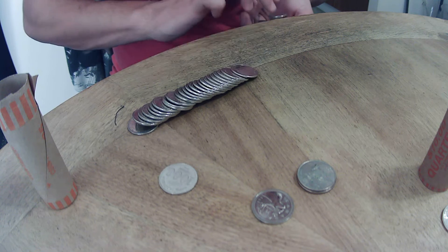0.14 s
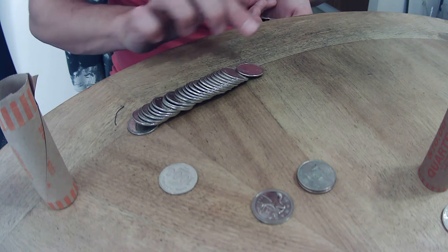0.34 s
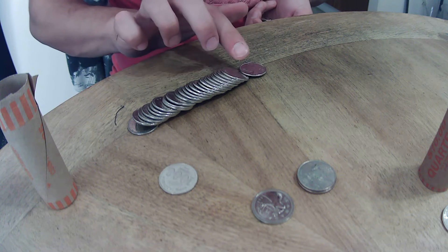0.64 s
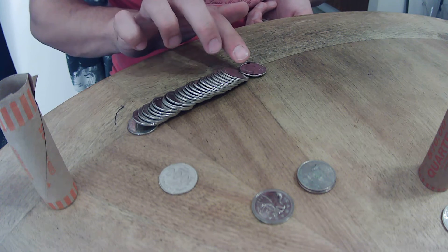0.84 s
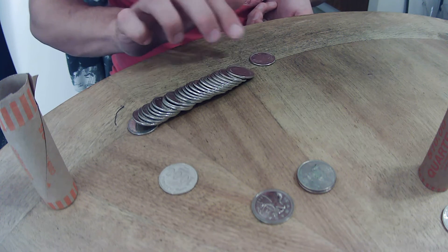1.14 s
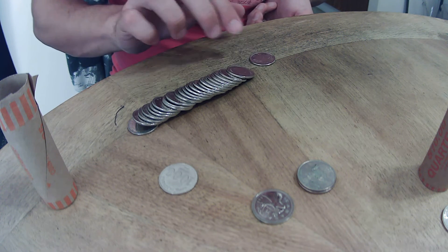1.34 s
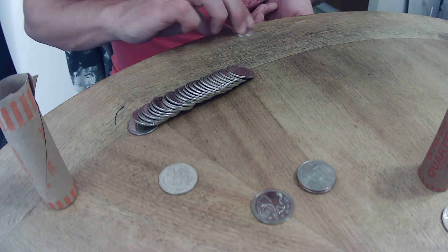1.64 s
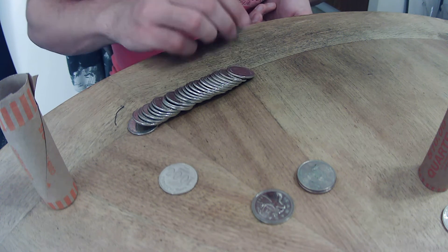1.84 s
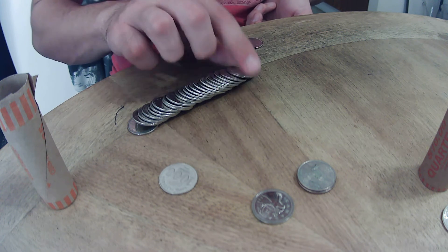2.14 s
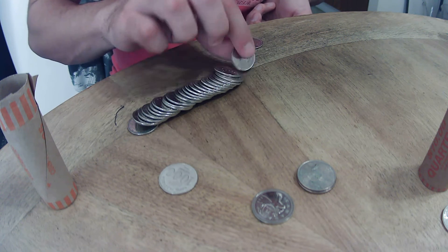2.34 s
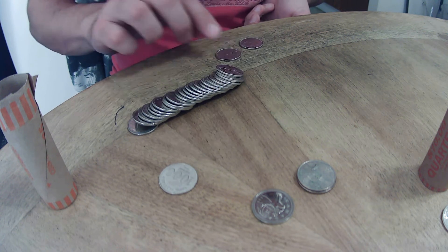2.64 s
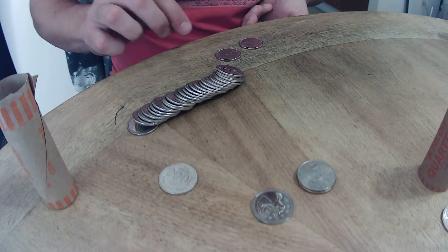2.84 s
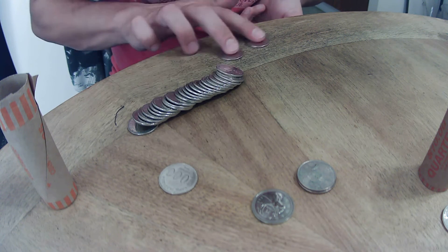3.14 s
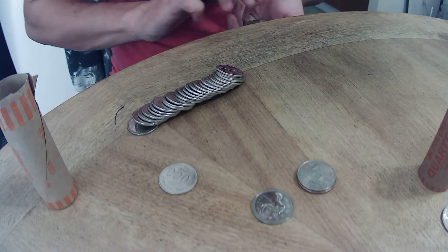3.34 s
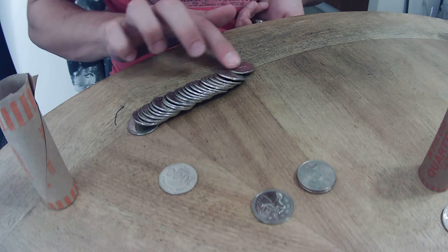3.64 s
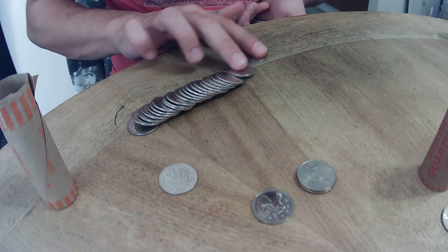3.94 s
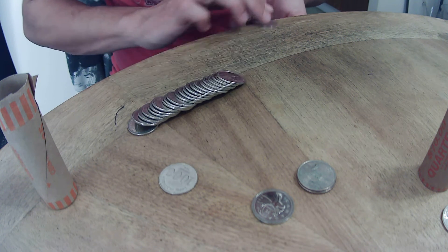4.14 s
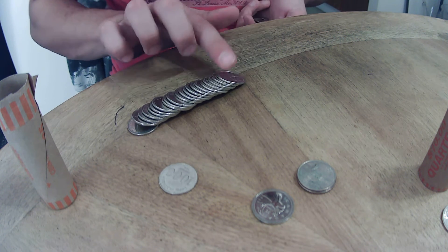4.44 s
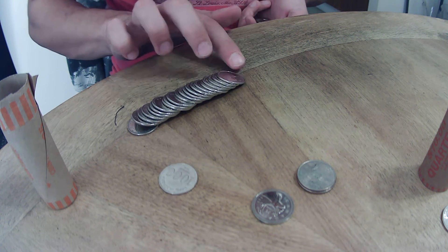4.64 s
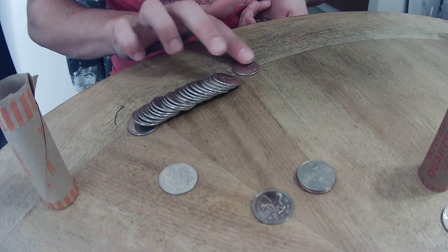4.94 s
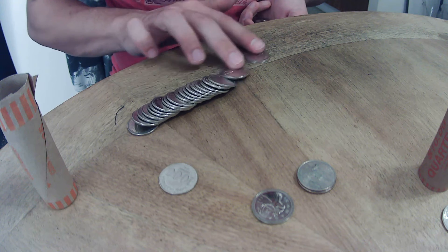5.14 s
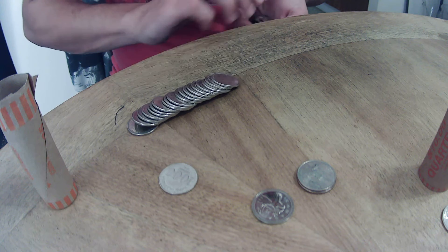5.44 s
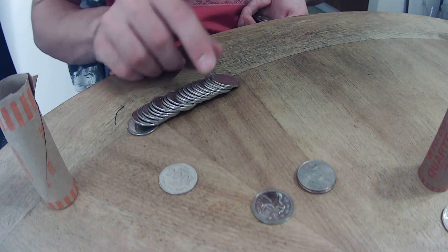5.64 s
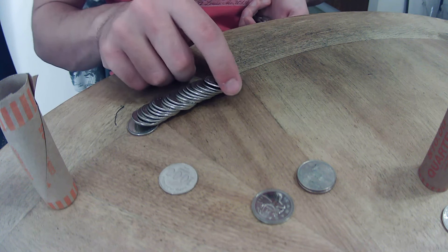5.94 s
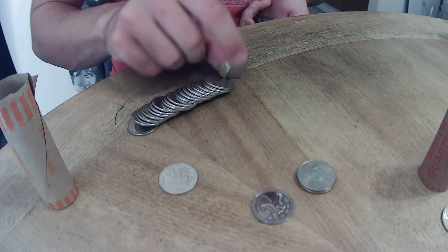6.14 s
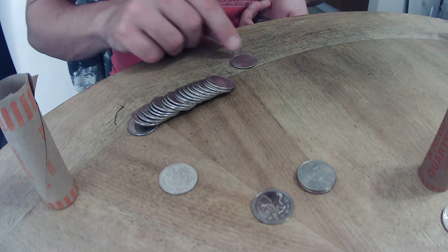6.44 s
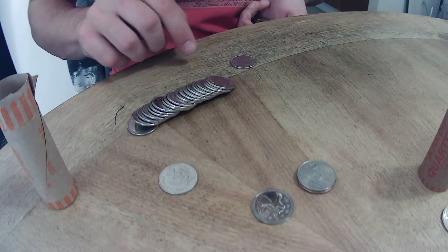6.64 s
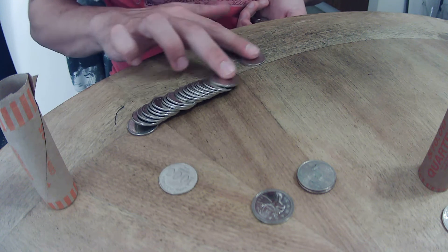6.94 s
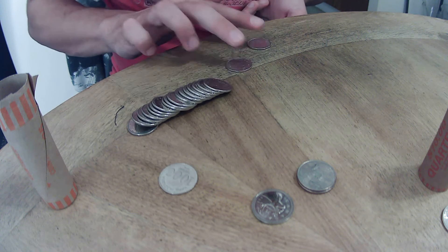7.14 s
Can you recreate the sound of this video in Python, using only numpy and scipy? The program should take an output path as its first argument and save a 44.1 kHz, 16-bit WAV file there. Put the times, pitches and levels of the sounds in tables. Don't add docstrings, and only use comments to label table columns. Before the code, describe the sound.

Metal coins are moved one at a time from a leaning stack on a wooden table. A quick bright rattle opens, then gritty scrapes and sharp flat slaps follow at uneven intervals, with more jangles midway. Late on, a coin flutters to rest in quick fading taps. Close microphone, small dry room, faint steady appliance hum.

```python
import sys
import numpy as np
from scipy import signal
from scipy.fft import rfft, irfft
from scipy.io import wavfile

SR = 44100
rng = np.random.default_rng(int(sys.argv[2]) if len(sys.argv) > 2 else 0)


def boost_factor(decibels):
    exponent = np.asarray(decibels, float) / 20
    return 10 ** exponent


def put_to_file(sound):
    columns = np.atleast_2d(sound).T
    safe = np.clip(columns, -1, 1)
    whole_steps = np.round(safe * 32767)
    wavfile.write(sys.argv[1], SR, whole_steps.astype(np.int16))


N = 321930

# hz [Hz], level_db [dB per Hz]
WHIR = [(12, -25), (20, 2), (63, 2), (146, -16.5), (177, -13), (216, -20), (301, -17.5), (388, -20.5),
        (558, -20), (607, -20), (718, -19.5), (1960, -19), (2390, -16.5), (3250, -31.5), (16000, -41)]
# pitch_hz [Hz], width_hz [Hz]
HUM = [(59.2, 18), (186.5, 5), (297.2, 3), (472, 3), (596.3, .2), (1192.5, .6), (1790.5, 1), (2310.9, .4)]
HUM_LEVELS = [-51, -59, -63.5, -67, -49.5, -90.5, -75.5, -54]
# hz [Hz], t60_s [s]
ROOM_DECAY = [(300, 0.21), (2000, 0.16), (6000, 0.2), (14000, 0.16)]

# start_s [s], fastest_s [s], stop_s [s], scrape_db [dB], rim_hiss_db [dB re scrape]
SLIDES = [(.008, -0.003, 0.092, -29.5, -3), (0.077, 0.117, 0.16, -36.5, -5), (0.933, 0.5, 1.2, -45, 4),
          (1.54, 1.59, 1.64, -33, -16), (1.58, 1.645, 1.72, -29, -14), (1.676, 2.2, 1.8, -36, -32),
          (1.84, 1.5, 2.06, -43, -25), (2.195, 1, 2.2, -41, 3), (2.237, 2, 2.26, -31, -1),
          (2.25, 1.5, 2.345, -32, -15), (2.438, 2.5, 2.58, -43, -30), (3.17, 3.255, 3.3, -32, -17),
          (3.6, 3.5, 3.73, -31, -8), (3.763, 4.5, 4.1, -51, -21), (3.9, 4, 4, -30, -14),
          (4.009, 4.07, 4.15, -33, -14), (4.06, 4.13, 4.2, -35, -10), (4.819, 6, 4.83, -27.5, -4),
          (4.832, 4.884, 4.965, -34, -9), (5.09, 5, 5.4, -36.5, -13), (5.116, 5.204, 5.28, -30.5, -11),
          (5.213, 5, 5.47, -31.5, -10.5), (5.26, 5.33, 5.39, -35, -9), (6.4, 6.43, 6.18, -44, 5),
          (6.968, 7.07, 7.08, -28, -16), (7.055, 7.08, 7.06, -28, -14)]
# pitch_hz [Hz], level_db [dB], t60_s [s]
SCRAPE_MODES = [(925, -10, 0.05), (1097, -10, 0.0322), (1450, -2, 0.023), (1813, 0, 0.026),
                (2100, 0.5, 0.022), (2500, 2.5, 0.016), (2900, -1.5, 0.0099), (3654, -2.5, 0.012),
                (4240, -6.5, 0.0068), (5400, -16, 0.0033)]
# start_s [s], fastest_s [s], stop_s [s], level_db [dB], pitch_hz [Hz]
SINGS = [(1.6, 1.625, 1.65, -34, 2130), (1.63, 1.655, 1.69, -40.5, 2250), (1.69, 1.712, 1.72, -35.5, 2060),
         (1.635, 1.652, 1.67, -35, 3900), (1.576, 1.6, 1.65, -40, 3370), (5.16, 5.178, 5.205, -42, 1950),
         (5.22, 5.27, 5.33, -40, 3300), (4.07, 4.11, 4.17, -42, 3300), (5.24, 5.255, 5.29, -36, 2500),
         (5.3, 5.33, 5.35, -44, 2000), (1.56, 1.575, 1.6, -43, 1200), (1.555, 1.595, 1.64, -42, 4300),
         (1.6, 1.645, 1.68, -47, 5600), (1.69, 1.715, 1.728, -45, 3700), (.0, .03, .09, -40, 3000),
         (4.04, 4.065, 4.1, -33, 1900), (1.885, 1.9, 1.94, -40, 2100)]

# start_s [s], liveliest_s [s], sizzle_db [dB]
RUBS = [
    (3.632, 3.637, -27),
    (3.978, 3.988, -39),
    (4.863, 4.888, -45),
    (5.147, 5.19, -54),
    (7.015, 7.065, -41.5),
]
# start_s [s], liveliest_s [s], jangle_db [dB], ring_db [dB], ring_start_db [dB]
RATTLES = [(0.193, 0.198, -21.5, -32, -25), (0.226, 0.232, -18, -11, -30), (0.306, 0.313, -28.5, -26, -40),
           (2.31, 2.35, -40, -19, -55), (3.36, 3.401, -20, -5.5, -14), (3.468, 3.473, -32.5, -40, -49),
           (4.227, 4.284, -23.5, -22, -30), (4.314, 4.324, -27, -26, -36), (5.4, 5.457, -24.5, -11, -20),
           (3.632, 3.635, -28.5, -55, -55), (.972, .982, -26, -24, -30), (6.405, 6.49, -55, -45, -36)]
# pitch_hz [Hz], level_db [dB], t60_s [s]
COIN_MODES = [(11045, -11, .04), (11170, -8, .05), (11270, -2, .075), (11345, -5, .05), (11420, -6, .05),
              (11495, -1.5, .065), (11570, -4, .06), (11680, -8, .05), (11820, -11, .035)]
# time_s [s], peak_db [dB], ring_db [dB re peak], sparkle_db [dB re peak]
TICKS = [(0.042, -36, -8, -10.5), (0.0644, -37, -7, -10), (0.095, -34, -6.5, -8), (0.1084, -33, -16, -12),
         (0.1191, -24.5, -21, -21), (0.94, -35.5, -17, -2), (2.193, -37, -18, 3.5), (2.2374, -35, -20, 3),
         (2.2947, -34, -22, -5), (2.304, -35, -11, 2), (2.314, -38, -2, 11.5), (2.339, -26, 3, 4.5),
         (3.612, -40, -25, -6), (3.6644, -38, -14, -3), (3.736, -25, -14, -9), (3.916, -37.5, -21, -10),
         (3.976, -40.5, 3, 4), (4.846, -44, -20, 4), (3.934, -42, -21, -10), (3.945, -42, -21, -10),
         (4.8556, -36.5, -18, 5), (4.897, -45, -9, 3), (5.0938, -43, -16, -1), (5.1066, -36, -15, -4),
         (5.145, -33, -18, -5), (5.1716, -42, 0, -1), (5.199, -34, -7, -8), (5.838, -55, -6, 13.5),
         (5.876, -47, -10, 3), (6.197, -41, -5, 7), (6.2412, -44, -8, -1), (6.999, -42, -11, -8),
         (7.0154, -40, -10, 4)]
# time_s [s], peak_db [dB], ring_db, sparkle_db, clack_db [all dB re peak]
JANGLES = [(0.194, -15, -7, -6, -7.5), (0.224, -16, 2, 4, 0), (0.2397, -19, -2, -3.5, -28),
           (0.247, -21, -9, -7, -18), (0.2647, -20, 0, -3, -31), (0.3066, -21.5, 0.5, -4, -20),
           (3.3556, -17, 2.5, 2.5, -3.5), (3.36, -22.5, 0, -7.5, -17), (3.3872, -18, 1, 4, -7),
           (3.379, -27, -6, -8, 8), (3.3975, -18.5, 3, -5, 4), (3.415, -31.5, -3, 1, 3),
           (3.372, -20.5, -6, 0, -15), (3.431, -26, -2, -3, -4), (5.4436, -21, -4, 2, -20),
           (3.467, -24, -7, 0, -23), (4.2275, -14.5, -8, -4.5, -5.5), (4.236, -14.5, 1, -11, -11),
           (4.242, -14.5, -3, 1, -10), (4.266, -17.5, 0.5, 2, -22), (4.2838, -18, -4, -1, -5.5),
           (4.315, -29, -15, 5, -20), (5.4019, -14.5, -11, -7, -20), (5.4105, -23, 4, -4, 4),
           (5.4163, -19, 1, -0.5, -18), (5.4479, -24, 7, 5, -20), (5.456, -19.5, -15, 3, -6)]

# pitch_hz [Hz], level_db [dB]
WOOD_LEVEL = [(700, -6), (1200, -6.5), (2000, 0.5), (3000, -1), (4500, -0.5), (7000, -32.5)]
# pitch_hz [Hz], t60_s [s]
WOOD_DECAY = [(700, 0.093), (2000, 0.03), (4000, 0.024), (7000, 0.0084)]
TABLE_MODES = [800, 1010, 1400, 1590, 1930, 2200, 2510, 2890, 3110, 3600, 3900, 4190, 4480, 5050]
# pitch_hz [Hz], level_db [dB], t60_s [s]
THUD_MODES = [(304, -6, 0.036), (437, 2, 0.026), (621, -8.5, 0.086)]
# time_s [s], pitch_hz [Hz], level_db [dB], t60_s [s]
NOTES = [(0.9719, 1932, -17, 0.063), (0.9723, 2500, -13.5, 0.043), (0.972, 4170, -17, .04),
         (1.9531, 2610, -19, 0.029), (1.952, 1990, -17, .06), (2.555, 2580, -15, 0.027),
         (2.5552, 3210, -20, 0.067), (2.572, 2450, -22.5, .04), (3.6345, 2860, -20, .025),
         (3.7212, 2150, -18, .03), (3.745, 2880, -23, 0.027), (4.0137, 2500, -12.5, 0.048),
         (4.0143, 4230, -18, .04), (4.953, 2850, -22, .03), (6.2846, 1960, -22, 0.036),
         (6.3836, 2063, -13, 0.071), (6.3836, 1600, -22, 0.066), (6.3823, 4220, -16, 0.028),
         (6.393, 2060, -15, .05), (6.4105, 2090, -18, .03), (6.4093, 4300, -18, 0.018),
         (6.4458, 4400, -24, .025), (6.477, 4500, -21, 0.018), (6.526, 4230, -25, 0.017),
         (7.0872, 2130, -22, 0.035), (3.374, 5220, -23, .04), (3.394, 4520, -24.5, 0.041),
         (3.416, 4420, -24, 0.036), (4.228, 7760, -21, .02), (4.239, 7800, -26, .04),
         (.9718, 7500, -20, .02), (2.5548, 7400, -19, .02), (2.564, 6600, -26, .05),
         (4.0226, 7500, -21, .015), (5.2085, 4300, -15, .012), (5.2085, 7000, -20, .012),
         (1.9524, 5900, -21, .02), (1.963, 3600, -24, .06), (1.963, 4700, -26, .04),
         (6.2843, 3100, -18, .01), (7.0872, 3770, -20, .03), (7.0872, 5040, -21, .02),
         (.2275, 4500, -22, .04), (.2405, 5500, -24, .03), (.248, 4300, -27, .04),
         (3.7212, 4190, -17, .015), (3.7452, 4200, -19, .015), (4.952, 3940, -22, .02),
         (5.412, 4700, -26, .03), (4.232, 4600, -24, .05), (4.268, 4400, -27, .05), (5.445, 4600, -28, .05),
         (5.465, 5000, -30, .05)]
# time_s [s], peak_db [dB], pitch_hz [Hz], thud_db [dB re peak]
TAPS = [(0.066, -25, 2000, -13), (0.0832, -23.5, 1940, -15), (0.099, -27, 2200, -17),
        (0.1411, -24.5, 1770, -16), (0.9394, -22.5, 1900, -16), (1.8355, -29, 2100, -0.5),
        (1.899, -34, 2090, -17), (2.1945, -25, 1950, -14.5), (2.243, -24.5, 1620, -11.5),
        (2.3146, -16, 1870, -14), (2.343, -15, 1930, -17), (2.339, -21, 1930, -15),
        (5.4562, -27, 1400, -10), (5.385, -30, 2500, -15), (2.3585, -24.5, 2900, -4.5),
        (2.4297, -19.5, 1790, -14), (2.4603, -34, 1840, -8), (3.2875, -26.5, 2290, -30),
        (3.664, -27.5, 2320, -2), (3.977, -19.5, 1780, -14), (4.8567, -21.5, 2250, -6),
        (4.8972, -28, 1540, -10), (4.932, -25.5, 1330, -23), (5.092, -34, 2100, -3.5),
        (5.1453, -31, 1900, -5), (5.1748, -24, 1960, -16), (5.277, -20, 2500, -37), (5.376, -27, 2140, -12),
        (5.8396, -32.5, 2300, -19), (6.197, -26.5, 2420, -10.5), (6.24, -34.5, 2290, -5),
        (6.9995, -37, 1920, 0), (7.0184, -32.5, 2200, -4)]
# time_s [s], knock_db [dB], pitch_hz [Hz], thud_db [dB re knock], crack_db [dB]
LANDINGS = [
    (0.9603, -18, 1590, -12, -20),
    (0.9807, -16, 1600, -14.5, -16),
    (.9652, -16, 1930, -19, -37),
    (3.6355, -13.5, 2760, -14.5, -17.5),
    (2.5546, -9.5, 2890, -20.5, -3.5),
    (2.572, -15, 2500, -17, -8),
    (3.6326, -15, 2400, -12.5, -19),
    (3.7212, -10, 2200, -18, -5.5),
    (4.9505, -24, 2890, -20, -24),
    (4.952, -16, 2600, -23.5, -11),
]
# time_s [s], knock_db [dB], pitch_hz [Hz], thud_db [dB re knock], crack_db [dB]
FLOPS = [(0.0014, -14.5, 3600, -12, -17), (0.124, -27, 3000, -29, -41), (0.9718, -9.5, 2210, -19, -5.5),
         (0.9701, -16, 3600, -15, -15), (3.7198, -24, 3110, -25, -22), (4.0122, -22, 2510, -25, -22),
         (4.027, -16, 4190, -28, -19), (4.04, -19, 3570, -26, -29), (1.9524, -7.5, 2200, -19, -4.5),
         (3.318, -32, 3000, -14, -38.5), (3.324, -41, 3000, -25, -39), (3.763, -21, 2380, -16, -25),
         (3.7438, -18, 4200, -19, -22.5), (3.7449, -14.5, 2870, -16, -14.5), (4.0134, -7, 2510, -19.5, -11),
         (4.0226, -12, 3110, -37, -8), (4.9714, -18, 2300, -19, -16.5), (5.2086, -15, 2510, -18, -2),
         (5.221, -20, 2200, -30, -32), (6.2843, -10, 2890, -21, -48), (6.382, -12.5, 4400, -38, -24),
         (6.384, -11, 2100, -39, -10), (6.393, -14, 2130, -45, -22), (7.0872, -12, 2170, -16, -10),
         (7.087, -16, 4200, -38, -18.5)]
# time_s [s], knock_db [dB]
WOBBLE = [
    (6.4098, -11),
    (6.416, -14),
    (6.4422, -22),
    (6.4455, -13),
    (6.4772, -14.5),
    (6.5042, -16.5),
    (6.525, -17.5),
    (6.5415, -22.5),
    (6.558, -31),
]

SCATTER_DB = 2.5


def rms_one(x):
    return x / np.sqrt(np.mean(x ** 2) + 1e-20)


def at_hz(points, hz):
    points = np.array(points)
    return np.interp(np.log(hz), np.log(points[:, 0]), points[:, 1])


def band(x, low_hz, high_hz):
    edges = [low_hz, min(high_hz, .45 * SR)]
    return signal.sosfilt(signal.butter(2, edges, "band", fs=SR, output="sos"), x)


def ring(clicks, hz, t60):
    r, w = boost_factor(-60 / (t60 * SR)), 2 * np.pi * hz / SR
    return signal.lfilter([0, np.sin(w)], [1, -2 * r * np.cos(w), r * r], clicks + 1e-18)


def train(times, gains):
    clicks = np.zeros(N)
    np.add.at(clicks, np.round(np.asarray(times) * SR).astype(int), gains)
    return clicks


def coloured(x, spectrum):
    hz = np.maximum(np.arange(N // 2 + 1) * SR / N, 5)
    return rms_one(irfft(rfft(x) * boost_factor(at_hz(spectrum, hz)), N))


def grains(per_s, spread_db):
    sizes = boost_factor(spread_db * np.minimum(rng.exponential(1, N), 4)) * rng.choice([-1, 1], N)
    return rms_one(sizes * (rng.random(N) < per_s / SR))


def struck(times, modes, level_db, detune):
    hz, db, t60 = np.transpose(modes)
    chance = rng.standard_normal((len(times), 3, len(modes)))
    t = np.arange(SR // 10)[:, None] / SR
    decay = boost_factor(-60 * t / np.minimum(t60, .12))
    out = np.zeros(N + len(t))
    for s, blow_db, (strong, shift, sign) in zip(times, level_db, chance):
        waves = np.sin(2 * np.pi * hz * (1 + detune * shift) * t) * decay
        gains = np.sign(sign) * boost_factor(blow_db + db + SCATTER_DB * strong)
        out[round(s * SR):][:len(t)] += waves @ gains
    return out[:N]


def stroke(table, column_db):
    power = np.zeros(N)
    for (start, fastest, stop, *_), db in zip(table, column_db):
        n = np.arange(round(start * SR), round(stop * SR))
        away = np.interp(n / SR, [start, fastest, stop], [1, 0, 1])
        power[n] += boost_factor(2 * (db - 23.5 * away ** 2))
    return np.sqrt(power)


def liveliness(table, first_db, top_db, fall_db_per_s):
    power = np.zeros(N)
    for (start, top, *_), a, b in zip(table, first_db, top_db):
        n = np.arange(round(start * SR), N)[:SR // 3]
        power[n] += boost_factor(2 * np.interp(n / SR, [start, top, top + 1], [a, b, b - fall_db_per_s]))
    return np.sqrt(power)


def appliance():
    out = boost_factor(-42.5) * coloured(rng.standard_normal(N), WHIR)
    for (hz, width_hz), db in zip(HUM, HUM_LEVELS):
        wander = np.cumsum(rng.standard_normal(N)) * np.sqrt(2 * np.pi * width_hz / SR)
        out += np.sqrt(2) * boost_factor(db) * np.sin(2 * np.pi * hz * np.arange(N) / SR + wander)
    return out


def room(x):
    t = np.arange(SR // 2) / SR
    onset = np.clip((t - .006) / 0.0011, 0, 1)
    tail = onset * rng.standard_normal(len(t)) * boost_factor(-60 * t / 0.19)
    return signal.oaconvolve(x, tail / np.sqrt(np.sum(tail ** 2)))[:N]


def scattered(x):
    out, white = np.zeros(N), rng.standard_normal((2, N))
    late = round(.0075 * SR)
    build = np.exp(-1 / (0.00021 * SR))
    for k, hz in enumerate(200 * 2 ** np.arange(0, 6.6, .4)):
        top_hz = hz * 2 ** .4
        keep = boost_factor(-120 / (at_hz(ROOM_DECAY, hz) * SR))
        smoother = np.convolve([1, -keep], [1, -build])
        energy = signal.lfilter([(1 - keep) * (1 - build)], smoother, band(x, hz, top_hz) ** 2 + 1e-18)
        echo = np.sqrt(np.abs(energy)) * rms_one(band(white[k % 2], hz, top_hz))
        out[late:] += echo[:-late]
    return out


def streak():
    turns = np.arange(N) / SR * 40
    return boost_factor(2.2 * np.interp(turns, np.arange(800), rng.standard_normal(800)))


def slides():
    clumps = rms_one(band(rng.standard_normal(N), 38, 114))
    slips = grains(8000, spread_db=2.0) * boost_factor(2.2 * clumps)
    scrape = np.zeros(N)
    for hz, db, t60 in SCRAPE_MODES:
        scrape += boost_factor(db) * ring(slips * streak() * rng.standard_normal(N), hz, t60)
    hiss = rms_one(band(slips, 3800, 10800))
    *_, scrape_db, rim_db = np.transpose(SLIDES)
    return rms_one(scrape) * stroke(SLIDES, scrape_db - 3.5) + hiss * stroke(SLIDES, scrape_db + rim_db - 8.0)


def sings():
    out, slips = np.zeros(N), grains(3000, spread_db=3.0)
    for row in SINGS:
        start, _, stop, db, hz = row
        n = slice(round(start * SR), round(stop * SR))
        out[n] += rms_one(ring(slips[n], hz, 0.017)) * stroke([row], [db])[n]
    return out


def rubs():
    sizzle_db = np.transpose(RUBS)[2]
    sizzle = rms_one(band(grains(4000, spread_db=3.5), 11800, 17100))
    return sizzle * liveliness(RUBS, sizzle_db, sizzle_db, fall_db_per_s=500)


def rattles():
    touches = grains(6000, spread_db=3.0)
    hiss = rms_one(band(touches, 3800, 14000))
    sizzle = boost_factor(1.0) * rms_one(band(touches, 16800, 16900))
    jangle_db = np.transpose(RATTLES)[2]
    return (hiss + sizzle) * liveliness(RATTLES, jangle_db - 2.5, jangle_db, fall_db_per_s=462.5) * boost_factor(-5.5)


def slaps():
    s, db = np.transpose(WOBBLE)
    beats = np.transpose([s, db, 2500 + 0 * s, -25 + 0 * s, db - 6])
    rolls = beats + [-.002, -8, 1800, 0, -8]
    return np.concatenate([LANDINGS, FLOPS, beats, rolls])


def all_clinks():
    s, db = slaps()[:, 0] - .0001, slaps()[:, -1]
    on_stack = np.arange(len(s)) < len(LANDINGS)
    flat = np.transpose([s, db, np.where(on_stack, -20.5, -28), np.where(on_stack, -20.5, -25.5)])
    return np.concatenate([flat, TICKS, np.array(JANGLES)[:, :4]]).T


def rings():
    s, peak_db, ring_db, _ = all_clinks()
    free_db = ring_db + 1.5 * np.minimum(ring_db + 20.5, 0) + 0.39 * np.minimum(peak_db + 37, 0)
    _, _, _, top_db, start_db = np.transpose(RATTLES)
    swell = liveliness(RATTLES, start_db, top_db, fall_db_per_s=568)
    touches = grains(2500, spread_db=1.0) * swell * boost_factor(-36.0)
    kept = sum(boost_factor(db) * ring(touches * rng.standard_normal(N), hz, t60) for hz, db, t60 in COIN_MODES)
    return kept + struck(s, COIN_MODES, (peak_db + free_db)[:, None] - 5, detune=0.0022)


def crack(times, level_db, low_hz, high_hz, decay_s):
    shape = signal.lfilter([1], [1, -np.exp(-1 / (decay_s * SR))], train(times, boost_factor(level_db)) + 1e-18)
    return band(shape * rng.standard_normal(N), low_hz, high_hz)


def clinks():
    s, peak_db, _, top_db = all_clinks()
    flat = slaps()
    click = band(train(s, boost_factor(peak_db)), 2800, 8500)
    smack = band(train(flat[:, 0], boost_factor(flat[:, 4] + 5.5)), 710, 5300)
    bright = crack(s, peak_db - 3.5, 3600, 8500, decay_s=0.0016)
    sparkle = crack(s, peak_db + top_db + 7.5, 10340, 17300, decay_s=0.0034)
    return click + smack + bright + sparkle


def notes():
    out, t = np.zeros(N + SR), np.arange(SR // 10) / SR
    for s, hz, db, t60 in NOTES:
        out[round(s * SR):][:len(t)] += boost_factor(db - 60 * t / t60) * np.sin(2 * np.pi * hz * t)
    return out[:N]


def all_knocks():
    s, db, _, _, clack_db = np.transpose(JANGLES)
    pile = np.transpose([s, db + clack_db, 4400 + 0 * s, -14 + 0 * s])
    return np.concatenate([slaps()[:, :4], TAPS, pile]).T


def knocks():
    s, peak_db, pitch_hz, thud_db = all_knocks()
    hz = np.array(TABLE_MODES)
    modes = np.transpose([hz, at_hz(WOOD_LEVEL, hz), at_hz(WOOD_DECAY, hz)])
    octaves = np.abs(np.log2(hz / pitch_hz[:, None]))
    place_db = 7.2 * np.exp(-(octaves / 0.12) ** 2) - 4.57 * octaves
    heft_db = 0.9 * (thud_db[:, None] + 21.5) * (hz < 1300)
    wood = struck(s, modes, peak_db[:, None] - 11.5 + heft_db + place_db, detune=0.0086)
    thud = struck(s, THUD_MODES, (peak_db + thud_db)[:, None] - 3.0, detune=0.093)
    snap = band(train(s, boost_factor(peak_db + 10.5)), 850, 3700)
    return band(wood, 774, 5300) + band(thud, 217.7, 1500) + snap


def scene():
    noises = knocks() + notes() + sings() + clinks() + slides() + rattles() + rubs()
    tones = rings()
    echoes = boost_factor(-7.5) * scattered(noises) + boost_factor(-9) * room(tones)
    return (noises + tones + echoes + appliance())[None]


def low_pass(x):
    return signal.sosfilt(signal.butter(12, 17030, fs=SR, output="sos"), x)


def record(dry):
    soft = .45 * np.tanh(dry / .45)
    cut = signal.sosfilt(signal.ellip(8, .3, 30, 15800, fs=SR, output="sos"), soft)
    return low_pass(cut)


dry = scene()
out = record(dry)
put_to_file(out)
```